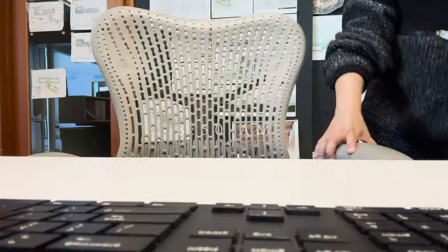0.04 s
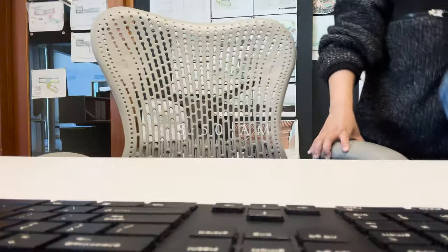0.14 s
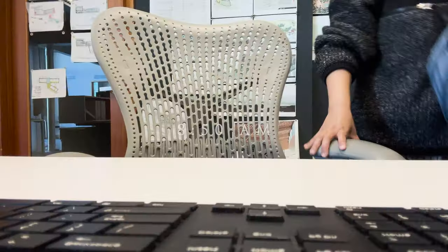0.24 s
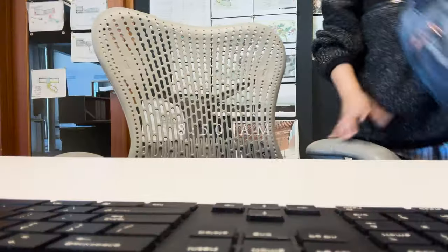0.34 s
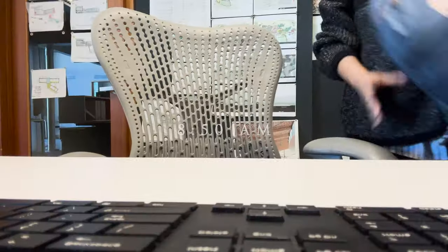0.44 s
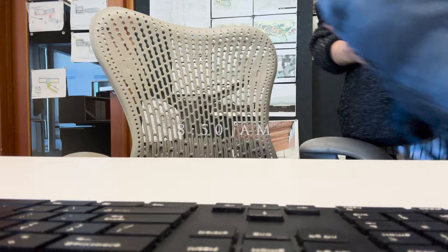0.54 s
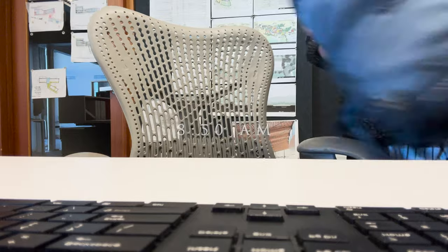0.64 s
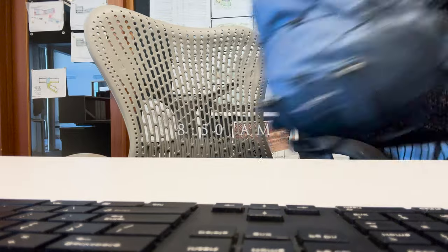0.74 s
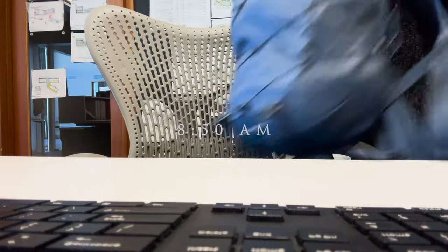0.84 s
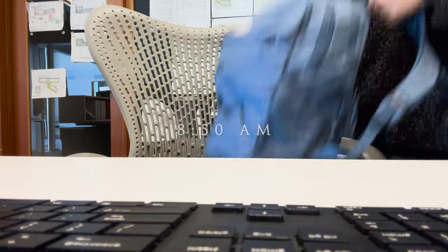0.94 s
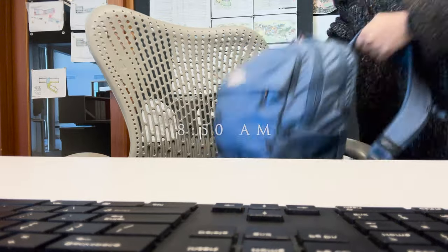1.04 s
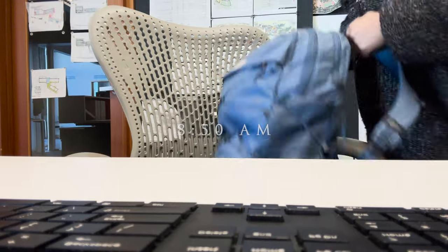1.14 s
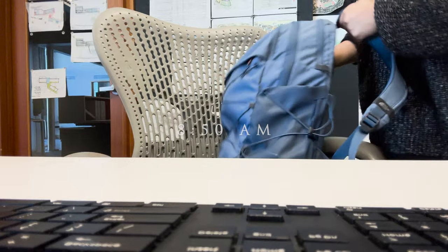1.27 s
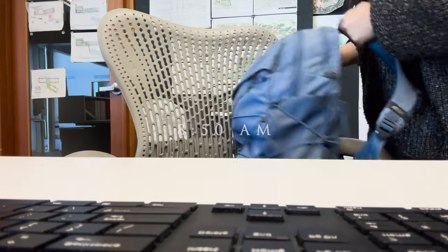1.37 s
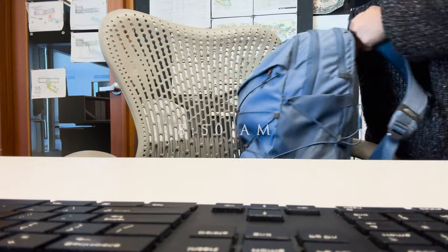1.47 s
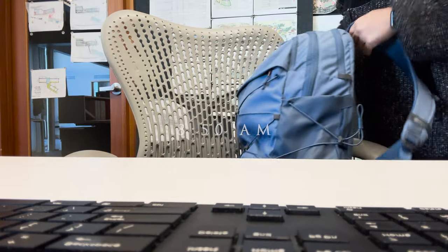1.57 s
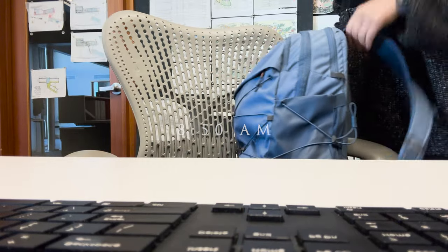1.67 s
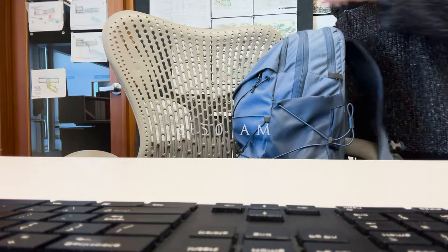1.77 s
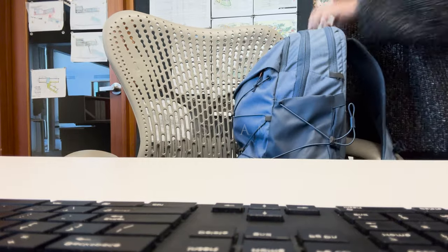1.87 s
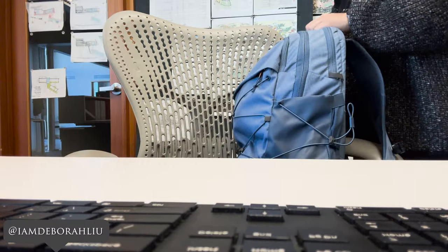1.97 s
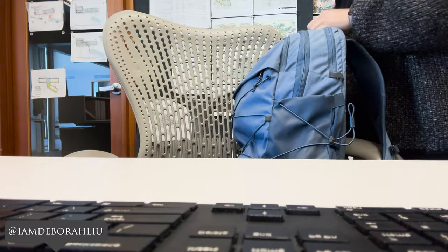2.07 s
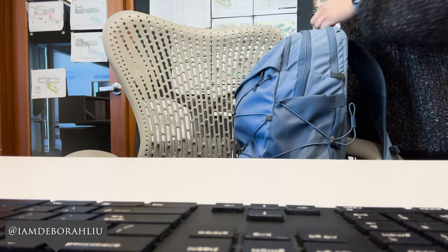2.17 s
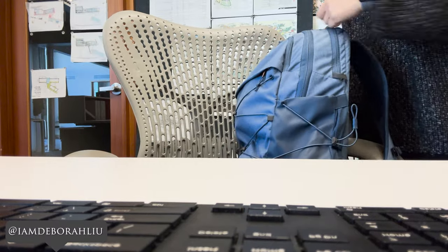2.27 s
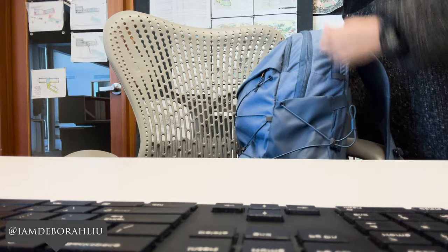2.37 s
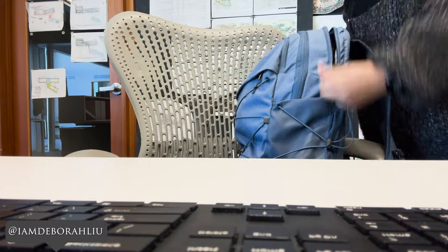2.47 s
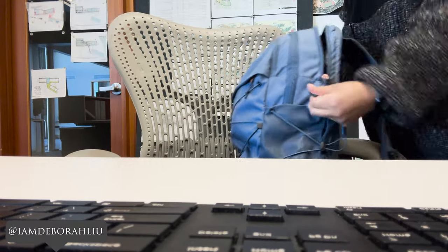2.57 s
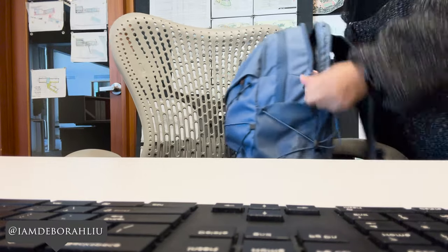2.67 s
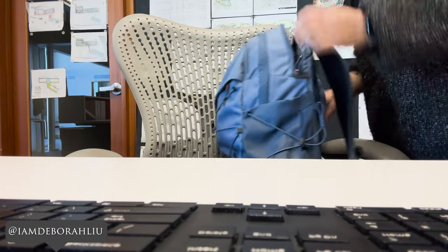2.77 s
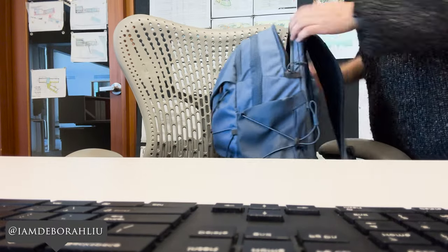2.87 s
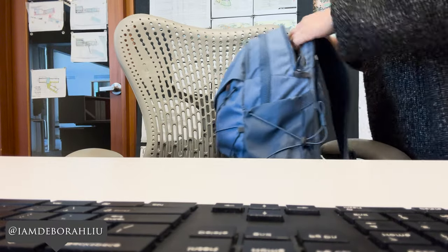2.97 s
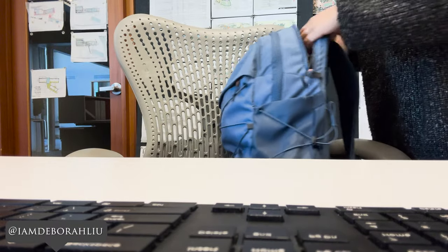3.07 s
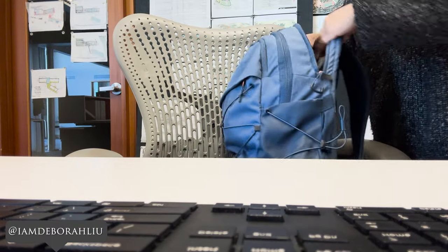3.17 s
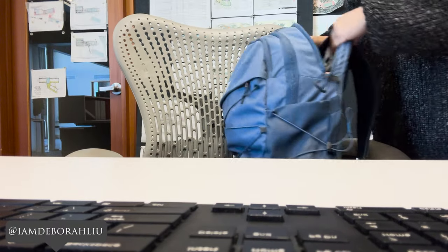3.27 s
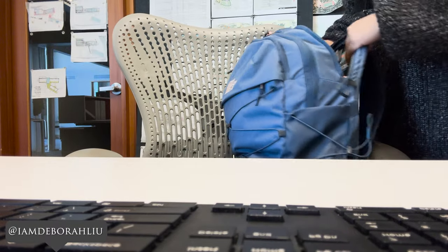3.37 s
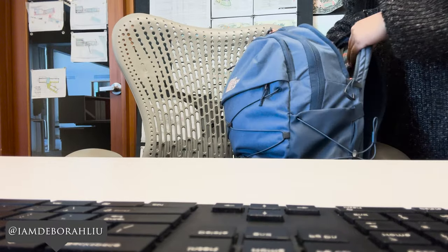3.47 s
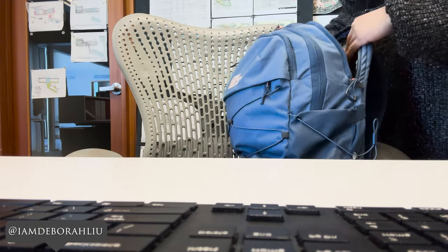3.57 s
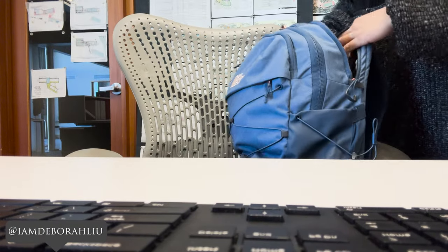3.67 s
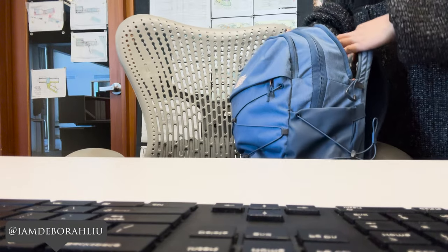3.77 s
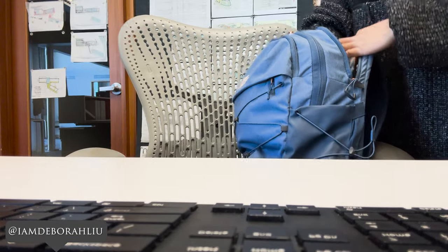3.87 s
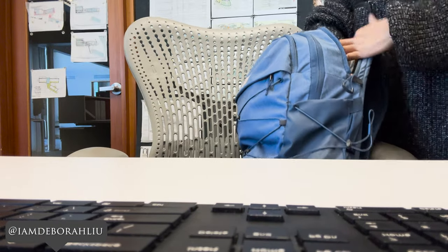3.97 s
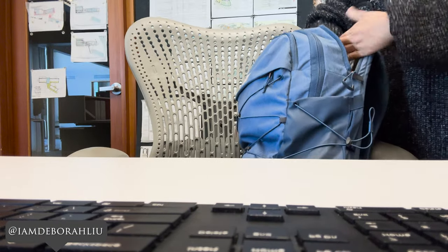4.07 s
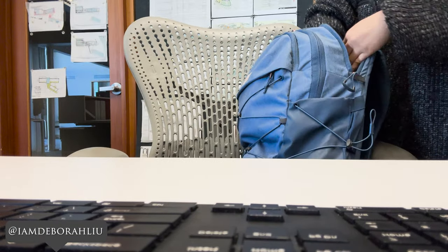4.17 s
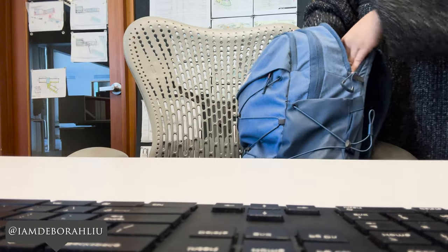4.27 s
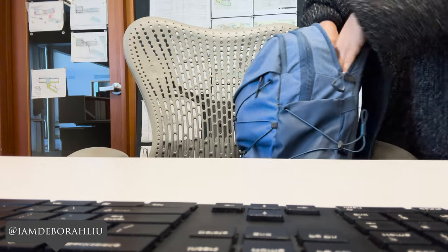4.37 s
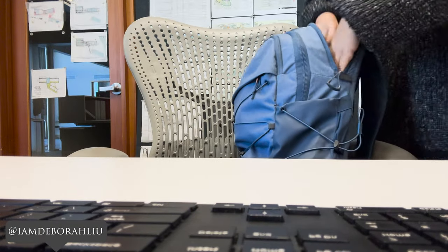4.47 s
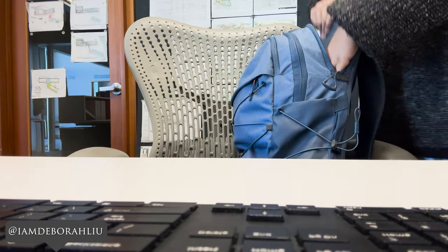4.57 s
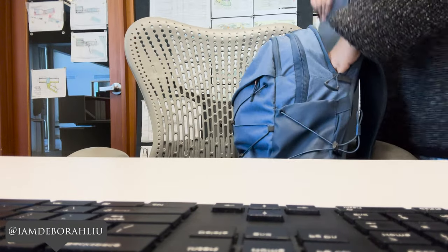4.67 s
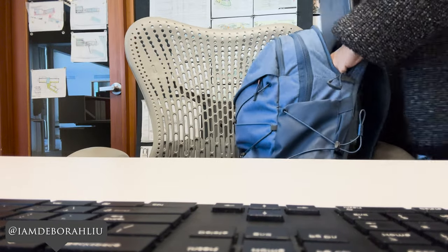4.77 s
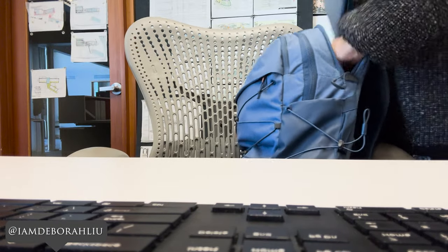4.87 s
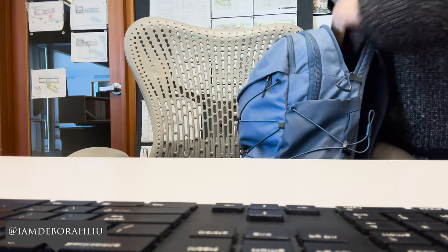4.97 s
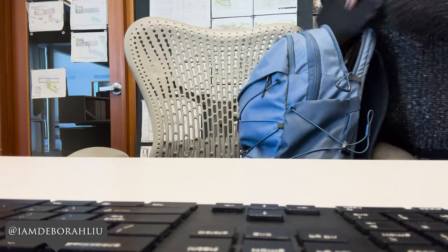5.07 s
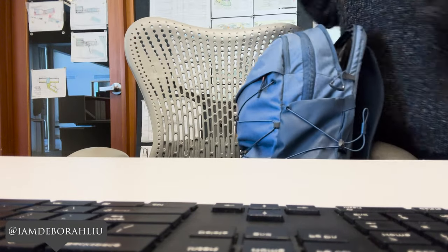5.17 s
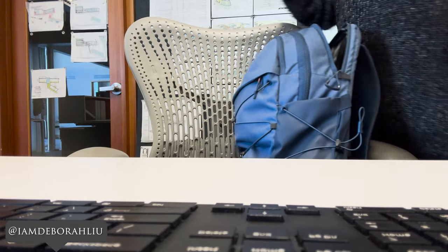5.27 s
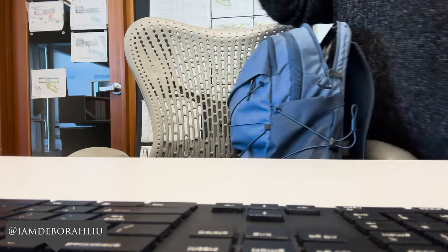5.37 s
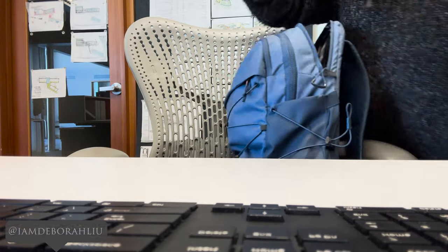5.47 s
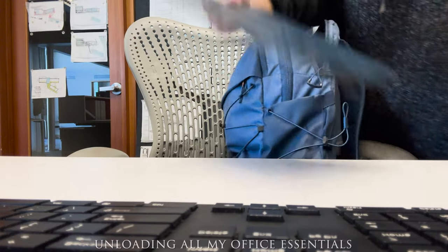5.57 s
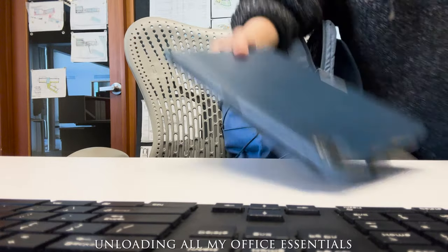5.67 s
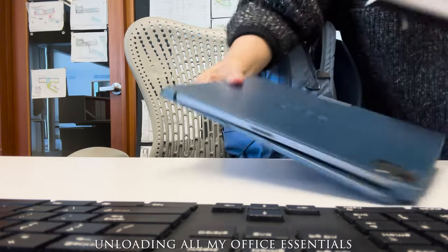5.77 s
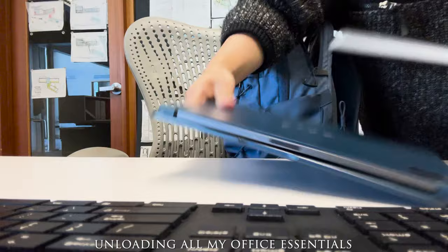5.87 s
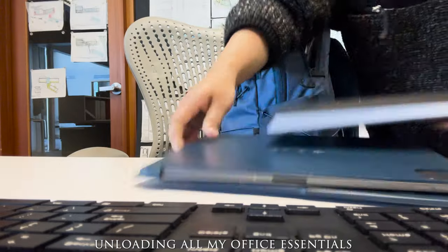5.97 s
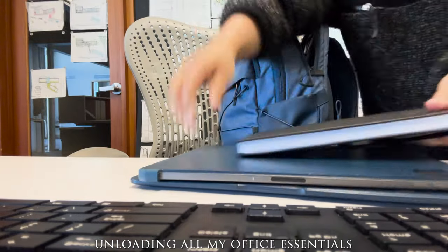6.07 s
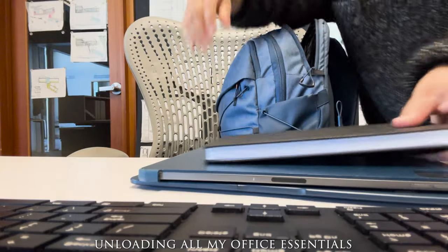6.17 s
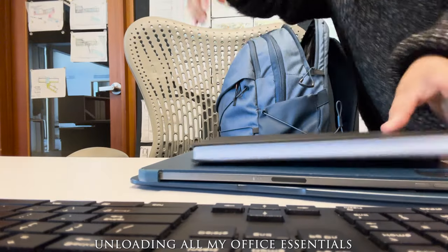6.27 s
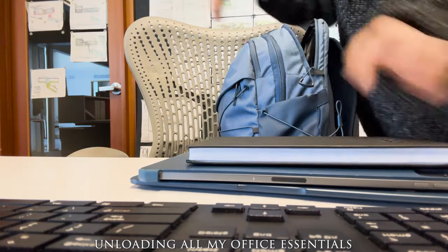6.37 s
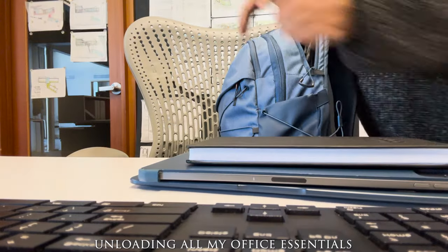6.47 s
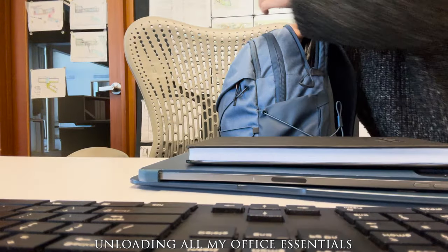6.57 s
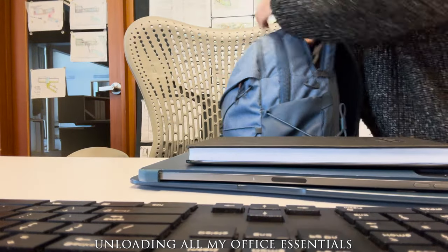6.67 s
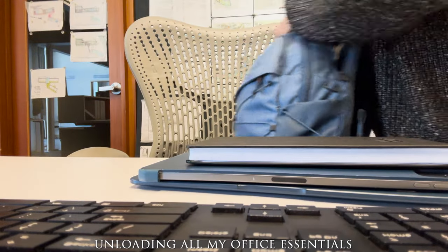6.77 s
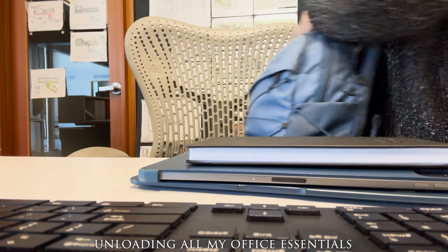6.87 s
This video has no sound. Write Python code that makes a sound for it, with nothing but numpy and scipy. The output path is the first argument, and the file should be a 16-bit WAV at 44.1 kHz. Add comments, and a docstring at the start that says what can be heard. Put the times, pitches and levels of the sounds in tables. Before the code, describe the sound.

Close stereo pickup at desk level in a small, fairly dry office with faint low ventilation. A nylon backpack rustles and bumps onto a chair, metal zipper pulls ticking. A plastic buckle snaps sharply, then a zipper buzzes quickly open. Hands rummage with soft crackling cloth and dull knocks of the contents, and finally a laptop and a notebook land with loud thuds and clacks.

```python
"""First a nylon backpack drops on an office chair: cloth rustles, zipper pulls tick, contents knock dully.
A buckle snaps, a zipper buzzes, the bag is rummaged in; a laptop and a notebook land on a desk close by.
Cloth is shaped noise with grains, the zipper a run of overtones and scrape, and struck objects are dying
sines with noise ticks. Sparse random taps make the room; ventilation noise rumbles quietly behind it all."""
import sys
import numpy as np
from scipy import signal
from scipy.fft import rfft, irfft
from scipy.io import wavfile
from scipy.ndimage import uniform_filter1d

SR = 44100
rng = np.random.default_rng(int(sys.argv[2]) if len(sys.argv) > 2 else 0)


def file_out(sig):
    """Save sig as 16-bit WAV at sys.argv[1]."""
    # one column per channel
    cols = np.atleast_2d(sig).T
    # limit, then scale
    lim = np.clip(cols, -1, 1)
    pcm = np.round(lim * 32767).astype(np.int16)
    wavfile.write(sys.argv[1], SR, pcm)


N = 305172  # length in samples


def gain_of(db):
    """Decibels to gain."""
    return 10 ** (np.asarray(db) / 20)


def evened(x):
    """Scales to unit rms."""
    return x / np.sqrt(np.mean(x ** 2) + 1e-20)


def smoothed_twice(x, size, axis=-1):
    """Slows noise down to a drift with two running means."""
    return uniform_filter1d(uniform_filter1d(x, size=size, axis=axis), size=size, axis=axis)


def read(points, hz):
    """Reads a curve on a log-frequency axis."""
    f, value = np.transpose(points)
    return np.interp(np.log(hz + 1), np.log(f + 1), value)


def add(mix, s, sound, pan_db=0):
    """Mixes a sound in at s seconds; pan_db is left over right."""
    part = mix[:, round(s * SR):][:, :len(sound)]
    part += gain_of([[pan_db / 2], [-pan_db / 2]]) * sound[:part.shape[1]]


def coloured(x, points):
    """Filters by a spectrum, to unit rms."""
    spectrum = gain_of(read(points, np.fft.rfftfreq(x.shape[-1], 1 / SR)))
    return evened(irfft(rfft(x) * spectrum, x.shape[-1]))


def ring(modes, rise, scuff, sag=0, settle=0.0029):
    """Dying sines driven by a contact whose chatter decays over scuff (s); pitch settles from 1 + sag."""
    t = np.arange(SR // 3) / SR
    bent = t + sag * settle * (1 - np.exp(-t / settle))
    tones = -sum(gain_of(db - 60 * t / t60) * np.sin(2 * np.pi * hz * bent) for hz, db, t60 in modes)
    chatter = rng.standard_normal(1024) * np.exp(-t[:1024] / scuff)
    chatter[0] = 2.8  # the first contact
    tones = signal.oaconvolve(tones * (1 - np.exp(-t / rise)), chatter)
    return tones / abs(tones).max()


def tick(colour, t60):
    """A short burst of noise with a sharp front."""
    t = np.arange(8192) / SR
    noise = coloured(rng.standard_normal(len(t)), colour)
    return noise * gain_of(-60 * t / t60) * (1 - np.exp(-t / 0.00034))


def pair(points, same, patchy_db, size):
    """Two channels of noise with drifting patches and a given likeness."""
    hop, hz = size // 4, np.fft.rfftfreq(size, 1 / SR)
    a, b, c, d, patches = rng.standard_normal((N // hop + 5, len(hz), 5)).T
    patches = uniform_filter1d(patches, size=9, axis=0)  # across frequency
    patches = evened(uniform_filter1d(patches, size=12, axis=1))  # across time
    same = np.clip(same * np.ones(len(hz)), 0, 1)[:, None]
    left = a + 1j * b
    right = same * left + np.sqrt(1 - same ** 2) * (c + 1j * d)
    z = np.array([left, right]) * gain_of(read(points, hz)[:, None] + patchy_db * patches)
    return evened(signal.istft(z, nperseg=size, noverlap=size - hop)[1][:, :N])


# Rustles of the cloth: [peak t/s, rise t/s, fall t/s, weave hiss level/dB, heavy folds level/dB]
RUSTLES = [(0.01, 0.028, 0.019, -39, -39), (0.19, 0.98, 0.24, -65, -52),
           (0.112, 0.013, 0.093, -55.5, -41.5), (0.561, .005, 0.095, -56, -52), (0.7, 0.2, 1, -60.5, -59),
           (0.95, 0.99, 0.41, -61, -67), (1.09, 0.15, 0.19, -50, -38), (1.37, 0.15, 0.18, -53.5, -46),
           (1.5, 0.27, 1, -61.5, -57), (1.96, 0.028, 0.15, -58.5, -63), (2.498, 0.33, 0.19, -52, -42),
           (2.729, 0.11, 0.095, -58, -55), (2.887, 0.0061, 1, -55, -53.5), (2.97, 0.098, 0.14, -50, -67),
           (3.35, 0.27, 0.2, -73, -45), (3.55, 0.19, 1, -55.5, -52), (3.7, 0.82, 0.13, -79, -52.5),
           (3.85, 0.2, 0.81, -61, -74), (4.151, 0.1, 1, -52, -48.5), (4.2, 0.048, 0.032, -41.5, -41),
           (4.45, 0.037, 0.24, -51.5, -45), (4.62, 0.11, 0.45, -57, -47.5), (4.9, 0.12, 0.83, -62.5, -65.5),
           (5.051, 0.41, 0.32, -50, -47.5), (5.2, 0.41, 0.023, -72, -43.5),
           (5.755, 0.04, 0.074, -47.5, -29.5), (5.9, 0.99, 0.9, -62, -53.5), (6.1, 0.11, 0.11, -46, -33),
           (6.205, 0.048, 0.16, -49, -40.5), (6.31, 0.22, 0.023, -50.5, -60), (6.66, 0.1, 0.29, -62.5, -58),
           (6.9, 0.17, 0.15, -64.5, -50)]
SWELL_DB = 20  # a rustle grows by this much in its rise and loses it in its fall


def rustling():
    """Levels of hiss and folds: every rustle swells to its peak and fades; their powers add."""
    t, power = np.arange(0, N, 32) / SR, 1e-12
    for s, rise, fall, *db in RUSTLES:
        away = np.where(t < s, (s - t) / abs(rise), (t - s) / abs(fall))
        power = power + gain_of(np.array(db)[:, None] - SWELL_DB * away) ** 2
    return [np.interp(np.arange(N) / SR, t, np.sqrt(p)) for p in power]


# Colour of the fine weave: [f/Hz, level per Hz/dB]
WEAVE_COLOUR = [(710, -15), (1200, -5.5), (1700, -3.5), (1980, -10.5), (3080, -5), (4240, -7), (4570, -4),
                (4880, -7), (7830, -2.5), (9330, -8), (13500, -7), (16000, -26), (16500, -44)]
CRACKLE_DB, CRACKLE_PER_S = -4, 1300  # level against the hiss; snaps per second over all pitches
CRACKLE_LOW_HZ, CRACKLE_HIGH_HZ = 900, 6000
CRACKLE_TURNS = 3  # cycles in which a snap decays by a factor e


def crackle():
    """Tiny creases snap, each ringing a few cycles; which pitches speak drifts as the hand moves."""
    out, t = np.zeros((2, N)), np.arange(1500) / SR
    for hz in np.geomspace(CRACKLE_LOW_HZ, CRACKLE_HIGH_HZ, num=12):
        knots = np.arange(N // 5000 + 2)
        drift = np.interp(np.arange(N) / 5000, knots, rng.standard_normal(len(knots)))
        when, strength, side = rng.random((N, 3)).T
        snap_db = 3.6 * np.minimum(-np.log(strength + 1e-9), 3.5) + 3.5 * drift
        snaps = (when < CRACKLE_PER_S / 12 / SR) * gain_of(snap_db)
        grain = np.sin(2 * np.pi * hz * t) * np.exp(-t * hz / CRACKLE_TURNS) * (1 - np.exp(-t * hz))
        out += signal.oaconvolve(snaps * np.array([.5 + side, 1.5 - side]), grain[None])[:, :N]
    return gain_of(CRACKLE_DB) * coloured(out, WEAVE_COLOUR)


# Colour of the heavy folds: [f/Hz, level per Hz/dB]
FOLDS_COLOUR = [(88, -36.5), (150, -26.5), (209, -1), (525, -13), (568, -7.5), (701, -14), (937, -12),
                (1680, -25), (1980, -27), (3500, -26.5), (4550, -36), (7700, -120)]


def cloth():
    """The weave hisses and crackles; folds buckle in dull, clumped grains."""
    hiss_level, folds_level = rustling()
    flicker = evened(smoothed_twice(rng.standard_normal(N), 400))
    hiss = pair(WEAVE_COLOUR, .4, patchy_db=2.5, size=512)
    strength = gain_of(1.2 * np.minimum(rng.exponential(1, N), 5))
    grains = strength * (rng.random(N) < 150 / SR)  # about 150 a second
    clumps = signal.oaconvolve(grains, np.exp(-np.arange(2000) / (0.00093 * SR)))[:N]
    buckling = pair(FOLDS_COLOUR, .6, patchy_db=1.7, size=512)
    folds = evened(buckling * (1 + 0.74 * clumps))
    weave = evened(hiss * (1 + 0.14 * clumps)) + crackle()
    return weave * hiss_level * gain_of(0.82 * flicker) + folds * folds_level


# Coated cloth slips: [t/s, level/dB, f/Hz, length t/s]
SQUEAKS = [(3.354, -35, 927, 0.019), (3.653, -41.5, 1687, 0.017), (4.471, -43.5, 922, 0.039),
           (5.019, -39, 824, 0.025)]


def squeaks():
    """Brief stick-slip tones that swell and fade."""
    out = np.zeros((2, N))
    for s, db, hz, length in SQUEAKS:
        t = np.arange(0, length, 1 / SR)
        turns = hz * (t + 0.0096 * t ** 2 / length)  # rises slightly
        tone = np.sin(2 * np.pi * turns) + 0.073 * np.sin(4 * np.pi * turns)
        add(out, s, gain_of(db) * tone * np.hanning(len(t)), pan_db=-5.0)
    return out


# Zipper stroke: [t/s, level/dB, teeth rate f/Hz, roughness/0-1, overtone slope/dB per octave]
ZIP_STROKE = [(2.2, -48, 248, 0.54, 3), (2.228, -34.5, 230, 0.18, -6.5), (2.255, -31.5, 311, 0.14, -1.5),
              (2.281, -27.5, 300, 0.13, -9), (2.295, -24, 410, 0.09, -6), (2.329, -28, 424, 0.16, -3),
              (2.352, -33, 540, 0.33, 4.5), (2.375, -31.5, 560, 0.42, 5), (2.394, -29, 585, 0.13, 0),
              (2.413, -34, 500, 0.38, 7), (2.438, -30.5, 470, 0.18, -3), (2.461, -37.5, 500, 0.32, 7),
              (2.482, -35, 553, 0.41, 10), (2.51, -32.5, 550, 0.63, 5), (2.54, -37.5, 440, 0.54, 1),
              (2.585, -36.5, 490, 0.3, -2), (2.62, -46.5, 460, 0.84, 0)]
# Taut cloth driven by the teeth: [f/Hz, level/dB]
ZIP_CLOTH = [(120, -1), (250, 13), (450, 6.5), (800, 5), (1200, 0), (1700, -11.5), (2200, -12),
             (5000, -17.5), (9000, -21)]
HALF_DB = -3  # alternate teeth catch harder: lines between the overtones, against them at full roughness


def zipper():
    """Each tooth kicks the taut cloth; an uneven hand blurs the buzz."""
    s, *columns = np.transpose(ZIP_STROKE)
    t = np.arange(s[0], s[-1], 1 / SR)
    db, hz, rough, tilt_db = (np.interp(t, s, c) for c in columns)
    rough = np.clip(rough, 0, 1)
    wobble = evened(uniform_filter1d(rng.standard_normal(len(t)), size=200))
    turns = np.cumsum(hz * (1 + (.025 + .085 * rough) * wobble)) / SR
    grip = smoothed_twice(rng.standard_normal((len(t), 6)), 350, axis=0)
    grip_db = (1.5 + 8 * rough) * evened(grip).T  # each overtone comes and goes as the cloth slackens

    def overtone(k, drift_db):
        return gain_of(tilt_db * np.log2(k) + drift_db) * np.cos(2 * np.pi * k * turns)

    whole = sum(overtone(k, grip_db[k - 1]) for k in range(1, 4))
    between = sum(overtone(k + .5, HALF_DB + grip_db[k + 3]) for k in range(3))
    teeth = whole + rough * between
    scrape = (1.1 + np.exp(-(turns % 1) / 0.57)) * rng.standard_normal(len(t))
    buzz = (1 - rough) * coloured(teeth, ZIP_CLOTH) + rough * coloured(scrape, ZIP_CLOTH)
    out = np.zeros((2, N))
    add(out, s[0], gain_of(db) * buzz * signal.windows.tukey(len(t), .08), pan_db=-1.0)
    return out


# A buckle hits hard plastic and bounces: [t/s, tick level/dB, tick t60 t/s, ring level/dB]
SNAP = [(2.045, -13.5, 0.011, -18), (2.0551, -19, 0.013, -35), (2.07, -37, 0.012, -52)]
# Ring of the buckle: [f/Hz, level/dB, t60 t/s]
BUCKLE_MODES = [(2330, 4, 0.007), (3480, -4.5, 0.047), (5860, 1, 0.012), (7540, -18.5, 0.023)]
# Colour of its tick: [f/Hz, level per Hz/dB]
BUCKLE_TICK = [(600, -10), (1100, 4), (2300, -6), (3200, -11.5), (4200, -13.5), (8000, -14), (21000, -20.5)]
# The contact weighs the hollow plastic's pitch down and lets go: [share/0-1, time constant t/s]
SNAP_LOAD = [(0.88, 0.0029), (0.12, 0.022)]
SNAP_DB, SNAP_HZ, SNAP_T60_S = -13.5, 873, 0.047  # hollow plastic: level before push, settled pitch, ring
SNAP_PUSH_DB, SNAP_PUSH_S = 7, .0021  # the first swing is stronger, most at this time


def buckle():
    """A blow rings hollow plastic, its pitch climbing as contact lifts; each bounce ticks and rings."""
    out, t = np.zeros((2, N)), np.arange(SR // 8) / SR
    hz = SNAP_HZ * (1 - sum(share * np.exp(-t / s) for share, s in SNAP_LOAD))
    push_db = SNAP_PUSH_DB * np.exp(-(t / SNAP_PUSH_S - 1) ** 2)
    fade_db = SNAP_DB + push_db - 60 * (t / SNAP_T60_S) ** 2.04
    hollow = -gain_of(fade_db) * np.sin(2 * np.pi * np.cumsum(hz) / SR)
    add(out, SNAP[0][0], hollow * (1 - np.exp(-t / 0.00023)))
    stops = [row[0] for row in SNAP[1:]] + [N / SR]
    for (s, tick_db, t60, ring_db), stop in zip(SNAP, stops):
        add(out, s, gain_of(tick_db) * tick(BUCKLE_TICK, t60))
        tones = ring(BUCKLE_MODES, rise=0.00033, scuff=0.00017, sag=-0.058)
        held = np.maximum(np.arange(len(tones)) / SR - (stop - s), 0)  # the next bounce stills the ring
        add(out, s, gain_of(ring_db) * tones * np.exp(-held / 0.0011))
    return out


KNOCK_T60_S = .04
KNOCK_SAG, KNOCK_SETTLE_S = .9, .0015  # a knock starts sharp by this share and settles
KNOCK_CLACK_DB, KNOCK_CLACK_S = -7.5, .035  # level against the ring, t60


def knock(out, row, colour, tick_s):
    """One knock: a dull ring inside a wide dry clack, and a tick."""
    s, ring_db, hz, tick_db, pan_db = row
    t60 = KNOCK_T60_S
    modes = [(0.732 * hz, -8, .5 * t60), (hz, 0, t60), (1.29 * hz, -8, 1.0 * t60)]
    clack = [(0.12 * hz, -20), (hz, 0), (2.56 * hz, -5), (5 * hz, -30), (21000, -60)]
    dull = ring(modes, rise=0.00046, scuff=0.00035, sag=KNOCK_SAG, settle=KNOCK_SETTLE_S)
    add(out, s, gain_of(ring_db) * dull, pan_db)
    add(out, s, gain_of(ring_db + KNOCK_CLACK_DB) * tick(clack, KNOCK_CLACK_S), pan_db)
    add(out, s, gain_of(tick_db) * tick(colour, tick_s), pan_db)


def bright(hz):
    """Colour of a tick centred on hz."""
    return [(600, -25), (0.14 * hz, -9), (hz, 0), (1.23 * hz, -7), (21000, -18)]


# Contents and straps knock dully: [t/s, ring level/dB, ring f/Hz, tick level/dB, left over right level/dB]
KNOCKS = [(0.106, -32, 685, -50, 5), (0.715, -31, 504, -38.5, -8.5), (0.745, -37, 404, -43.5, 2),
          (0.946, -40, 844, -38.5, 7), (1.076, -30.5, 904, -38, 2), (1.088, -28.5, 400, -45, 2),
          (1.178, -43, 960, -44.5, 0), (1.807, -38.5, 356, -50.5, 11), (2.905, -39.5, 690, -62, 4),
          (3.161, -38, 994, -52, -2), (3.874, -38.5, 410, -49, -1), (4.324, -38, 928, -48, -3),
          (5.108, -30.5, 810, -48, -2), (5.136, -28.5, 770, -33.5, -4), (5.141, -21, 342, -30, 4),
          (5.148, -28, 414, -43, -4), (5.202, -16, 500, -56, -2), (5.21, -45, 770, -35.5, 5),
          (5.246, -31, 490, -56, 0), (5.314, -30.5, 476, -57, -8), (5.327, -29, 538, -40, 1),
          (6.339, -30, 560, -33.5, 4), (6.594, -41, 476, -55.5, 1)]


def knocks():
    """Contents and straps each ring, clack and tick as they strike."""
    out = np.zeros((2, N))
    for row in KNOCKS:
        knock(out, row, bright(2800), tick_s=0.021)
    return out


# Metal zipper pulls: [t/s, ring level/dB, ring f/Hz, tick level/dB, left over right level/dB]
PULLS = [(0.061, -51, 920, -28.5, -1), (0.159, -40, 1020, -24.5, 0), (0.561, -42.5, 618, -51, 1),
         (0.861, -38, 512, -38.5, -1.5), (1.819, -41.5, 417, -44.5, -2), (1.946, -39, 370, -51, 0)]
# Colour of their tick: [f/Hz, level per Hz/dB]
PULL_TICK = [(600, -22), (3500, -8.5), (8600, -1.5), (10000, 0), (11000, -33), (21000, -22.5)]
# Ring of the small metal tab: [f/Hz, level/dB, t60 t/s]
PULL_MODES = [(4700, -11, 0.009), (6900, -10, 0.015), (8620, 0, 0.013), (9550, -5, .011)]
PULL_RING_DB = 7  # against the tick
PULL_RATTLE_DB, PULL_RATTLE_S = -35.5, 0.65  # the tab shivers on: level against the tick, t60


def pulls():
    """Each metal tab knocks and ticks brightly, rings and shivers on."""
    out = np.zeros((2, N))
    for row in PULLS:
        knock(out, row, PULL_TICK, tick_s=0.021)
        s, _, _, tick_db, pan_db = row
        tab = ring(PULL_MODES, rise=.0004, scuff=.00001)
        add(out, s, gain_of(tick_db + PULL_RING_DB) * tab, pan_db)
        add(out, s, gain_of(tick_db + PULL_RATTLE_DB) * tick(PULL_TICK, PULL_RATTLE_S), pan_db)
    return out


# Low soft bumps of the bag, then a hollow case ring near 6.34 s: [t/s, level/dB, f/Hz, t60 t/s]
BUMPS = [(1.036, -34, 237, 0.26), (1.075, -28, 279, 0.069), (1.089, -28.5, 210, 0.18),
         (1.124, -36, 295, 0.2), (1.163, -33, 244, 0.061), (2.537, -21, 270, 0.035),
         (3.881, -33.5, 202, 0.055), (6.341, -20.5, 442, 0.04), (6.3478, -20, 470, 0.02)]


def bumps():
    """Soft bumps and a hollow case ring: each is three short modes with a rounded onset."""
    out = np.zeros((2, N))
    for s, db, hz, t60 in BUMPS:
        modes = [(0.56 * hz, -10, t60), (hz, 0, t60), (1.47 * hz, -11, t60)]
        add(out, s, gain_of(db) * ring(modes, rise=0.0012, scuff=0.00077))
    return out


# Ring of the desk top: [f/Hz, level/dB, t60 t/s]
DESK_MODES = [(88.7, 16, 0.25), (123, -7.5, 0.46), (230, 6, 0.03)]
# Colour of the wave front: [f/Hz, level/dB]
WAVE_COLOUR = [(50, -34), (100, -0.5), (250, 0.5), (600, -7), (1200, -17), (2500, -40.5)]
SPREAD_TURNS = 1.4  # bending waves arrive late by about this many of their own cycles
WAVE_DB = 4  # wave front against the desk ring


def thud():
    """A blow travels through the desk top: treble first, bass later, so it sweeps down into the ring."""
    tones = ring(DESK_MODES, rise=.001, scuff=.00002)
    hz = np.fft.rfftfreq(len(tones), 1 / SR)
    spread = SPREAD_TURNS * rng.uniform(.92, 1.08)
    late = np.exp(-2j * np.pi * spread * np.log(np.clip(hz, 40, 3000) / 3000))
    front = irfft(gain_of(read(WAVE_COLOUR, hz)) * late, len(tones))
    swept = irfft(rfft(tones) * late, len(tones)) + gain_of(WAVE_DB) * front / abs(front).max()
    swept = swept[:SR // 4] * np.minimum(np.arange(SR // 4) / 20, 1)
    return swept / abs(swept).max()


# Laptop and notebook meet the desk:
# [t/s, thud level/dB, clack level/dB, edge tick level/dB, left over right level/dB]
BLOWS = [(5.7376, -12.5, -19.5, -25, 13), (5.7414, -28, -22, -16, 2), (5.749, -22.5, -30, -33, -4),
         (5.777, -37, -26.5, -26, 0), (5.854, -29.5, -30, -26, 4), (5.943, -36.5, -27.5, -28, 2.5),
         (6.015, -32, -42, -42.5, 1.5), (6.046, -31.5, -15.5, -14, 8), (6.053, -19.5, -19, -20.5, -12),
         (6.064, -20, -27.5, -27, 0), (6.085, -22.5, -24, -11.5, -9.5), (6.0895, -23, -14.5, -14, 12.5),
         (6.0932, -7, -24, -30, 5), (6.111, -18, -26.5, -24.5, 0), (6.117, -19.5, -34, -20, 2.5),
         (6.343, -25.5, -50.5, -37.5, -7)]
# Ring of the laptop shell: [f/Hz, level/dB, t60 t/s]
SHELL_MODES = [(323, -9, 0.087), (445, -7.5, 0.09), (693, -0.5, 0.053), (782, 1, 0.028), (950, -1, 0.02),
               (1260, -1.5, 0.023), (1860, -29, 0.0046)]
# Colour of hard edge ticks: [f/Hz, level per Hz/dB]
EDGE_COLOUR = [(880, 3), (1500, -2), (2200, -3.5), (3300, 1.5), (5470, -2.5), (6620, -8.5), (7850, -5.5),
               (9790, -12.5), (12300, -9.5), (16500, -37)]


def desk():
    """Each blow thuds in the desk top, clacks in the shell, slaps out air and ticks at the edge."""
    out = np.zeros((2, N))
    slap = [(100, -10.0), (250, 4), (700, -2), (1500, -5.5), (4000, -29.0)]
    for s, thud_db, clack_db, tick_db, pan_db in BLOWS:
        add(out, s, gain_of(thud_db) * thud(), pan_db=-1.5)
        add(out, s, gain_of(clack_db) * ring(SHELL_MODES, rise=0.00068, scuff=0.0018, sag=0.2), pan_db)
        add(out, s, gain_of(clack_db - 4.5) * tick(slap, t60=0.04), pan_db)
        add(out, s, gain_of(tick_db) * tick(EDGE_COLOUR, t60=0.014), pan_db)
    return out


# Decay of the room: [f/Hz, t60 t/s]
ROOM_DECAY = [(100, 0.51), (500, 0.1), (2000, 0.12), (8000, 0.047), (16000, 0.053)]


def office(x):
    """Sparse taps of random sign, each band dying at its own speed."""
    taps = np.zeros((2, SR // 2))
    at = np.arange(120, SR // 2 - 20, 20)
    at = at + rng.integers(0, 20, (2, len(at)))
    np.put_along_axis(taps, at, rng.choice([-1., 1.], at.shape), 1)
    hz, t, z = signal.stft(taps, SR, nperseg=256)
    z = z * (hz / (hz + 400))[:, None]  # little diffuse bass this close to the source
    tail = signal.istft(z * gain_of(-60 * t / read(ROOM_DECAY, hz)[:, None]), SR, nperseg=256)[1]
    return signal.fftconvolve(x, tail / np.linalg.norm(tail[0]), axes=1)[:, :N]


# Colour of the ventilation: [f/Hz, level per Hz/dB]
AIR_COLOUR = [(25, -43.5), (49, -2), (121, -0.5), (172, -15.5), (208, -6.5), (296, -15.5), (483, -21),
              (568, -26.5), (706, -26.5), (1250, -43.5), (2150, -56.5), (2750, -52), (13600, -84),
              (16500, -65)]
# Left-right likeness of the air noise: [f/Hz, likeness/0-1]
AIR_SAME = [(40, 1), (130, 0.87), (300, 0.69), (700, 0.075), (3000, 0.08), (15000, .1)]
# Swell of the lowest air noise, before the hum joins it: [t/s, level/dB]
RUMBLE = [(0, -41), (0.4, -48.5), (1.1, -44), (1.73, -47), (2.8, -44), (3.55, -49.5), (3.948, -42.5),
          (4.298, -47), (5.72, -47.5), (5.901, -32.5), (6.0, -39.5), (6.3, -36), (6.47, -47.5),
          (6.92, -45.5)]
AIR_DB = -42.5  # whole air noise, before its lowest part is given the rumble's level
HUM_HZ, HUM_DB = 65.4, -5  # a wavering hum inside the rumble, level against it


def ventilation():
    """Steady air noise whose lowest part, with a narrow-band hum, swells and sinks."""
    same = read(AIR_SAME, np.fft.rfftfreq(2048, 1 / SR))
    air = gain_of(AIR_DB) * pair(AIR_COLOUR, same, patchy_db=1.44, size=2048)
    low = signal.oaconvolve(air, signal.firwin(2047, 165, fs=SR)[None], "same")
    band = [(HUM_HZ - 14, -60), (HUM_HZ - 4, -4), (HUM_HZ, 0), (HUM_HZ + 4, -4), (HUM_HZ + 14, -60)]
    hum = gain_of(HUM_DB) * coloured(rng.standard_normal(N), band)
    s, db = np.transpose(RUMBLE)
    return air - low + (evened(low) + hum) * gain_of(np.interp(np.arange(N) / SR, s, db))


# Phase between two microphone ports: [f/Hz, left lead/rad]
PORT_LEAD = [(0, 0), (1460, -0.5), (2500, 0.1), (3360, -1.1), (4130, -1.4), (6720, 0.9), (8100, -0.9),
             (9040, -2.9), (9650, -3.2), (11400, -5.9), (12600, -6.4), (14100, -9.1), (16600, -12.2)]


def scene():
    """Most near sounds meet the ports with a phase lead, the buckle head-on; the room answers hits."""
    hits = knocks() + pulls() + bumps() + squeaks() + desk() + zipper()
    snap = buckle()
    near = hits + cloth()
    turn = np.exp(1j * read(PORT_LEAD, np.fft.rfftfreq(N, 1 / SR)))
    near = np.array([irfft(rfft(near[0]) * turn, N), near[1]])
    room = office(gain_of(-6.5) * hits + gain_of(-21.5) * snap)
    return near + snap + room + ventilation()


LOW_PASS_HZ = 16700  # middle of the low-pass slope


def record(dry):
    """Steep low-pass: next to nothing sounds above its slope."""
    low_pass = signal.firwin(511, LOW_PASS_HZ, window=("kaiser", 9), fs=SR)
    return signal.oaconvolve(dry, low_pass[None], "same")


dry = scene()
out = record(dry)
file_out(out)
```